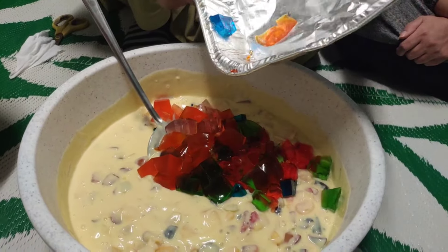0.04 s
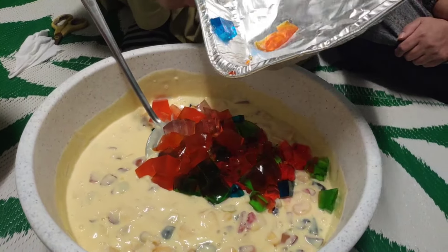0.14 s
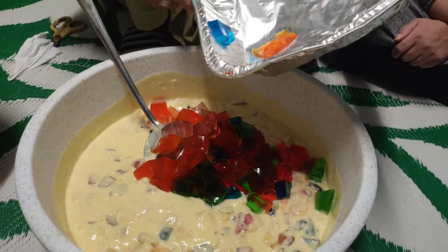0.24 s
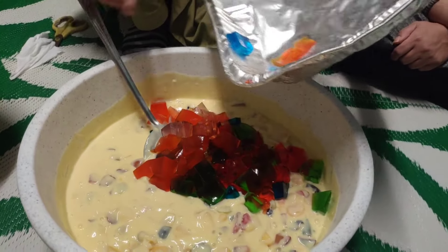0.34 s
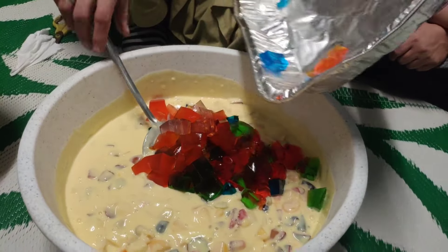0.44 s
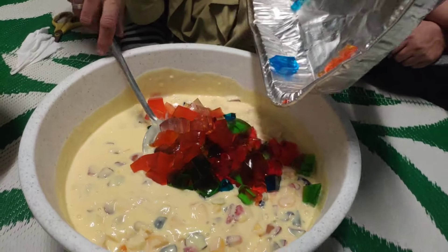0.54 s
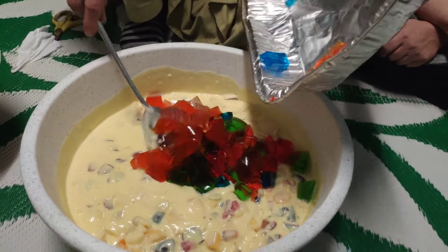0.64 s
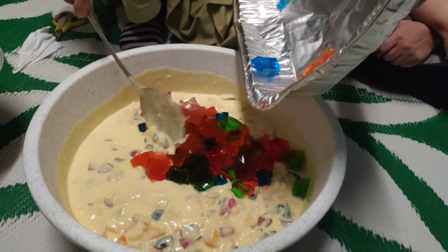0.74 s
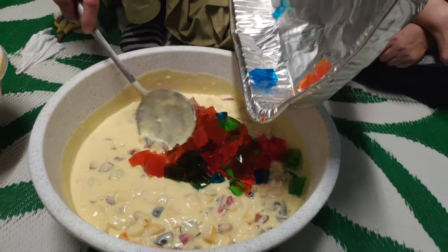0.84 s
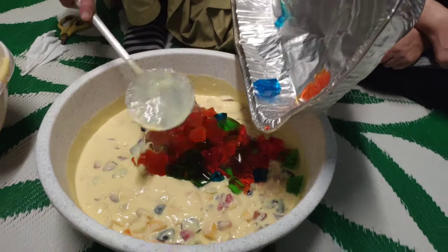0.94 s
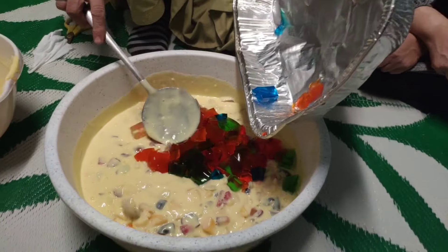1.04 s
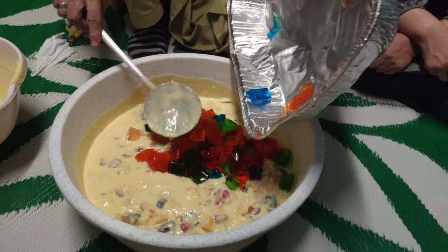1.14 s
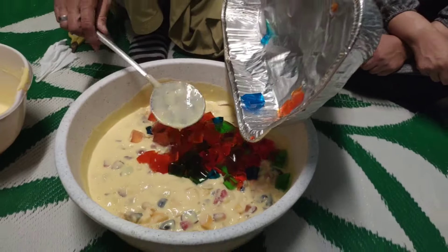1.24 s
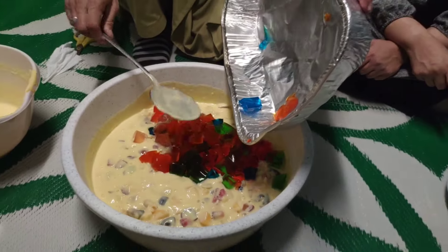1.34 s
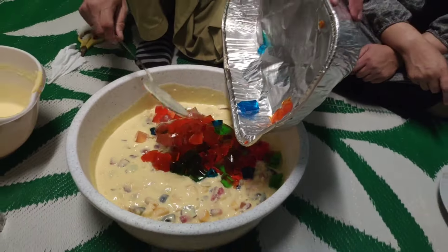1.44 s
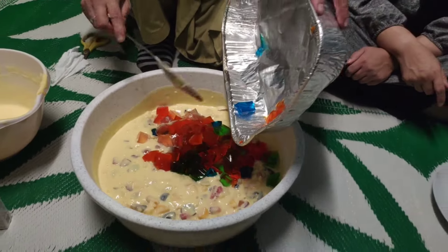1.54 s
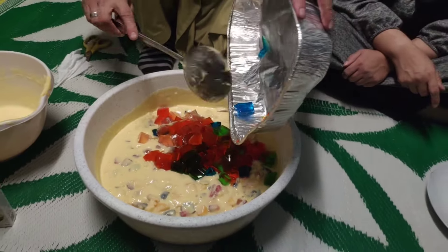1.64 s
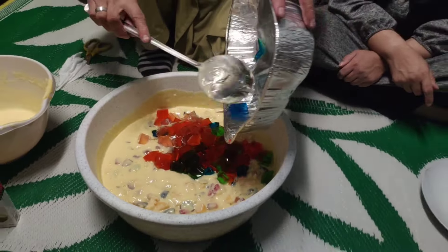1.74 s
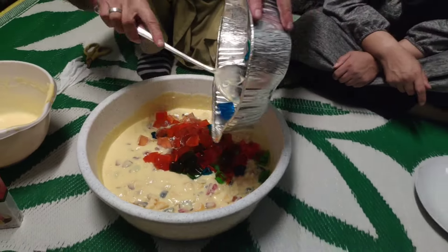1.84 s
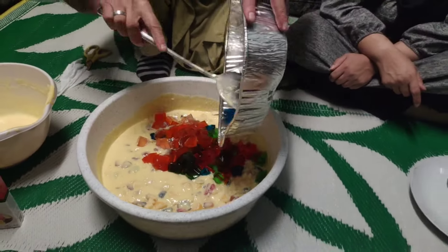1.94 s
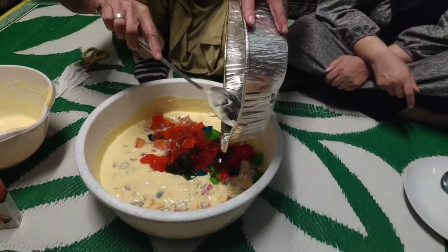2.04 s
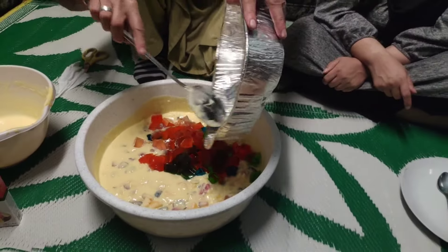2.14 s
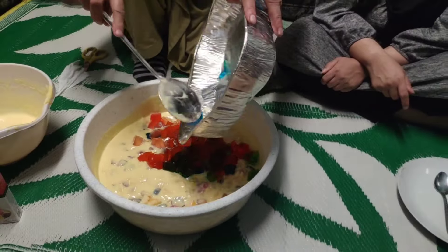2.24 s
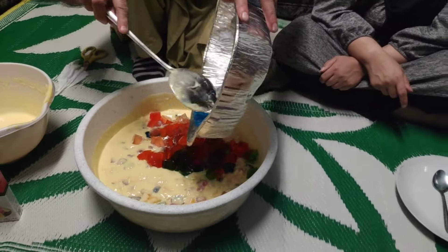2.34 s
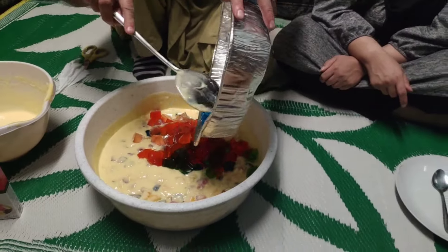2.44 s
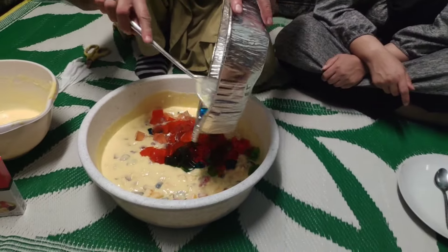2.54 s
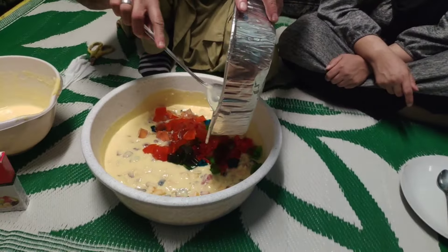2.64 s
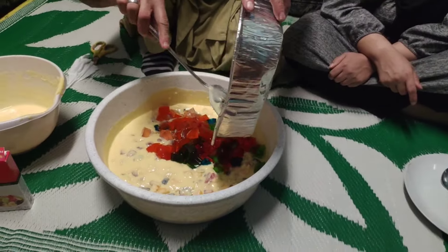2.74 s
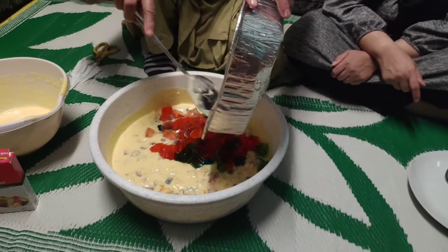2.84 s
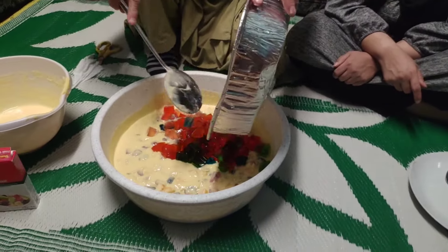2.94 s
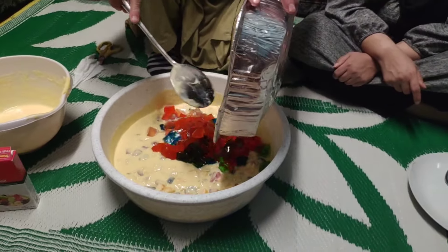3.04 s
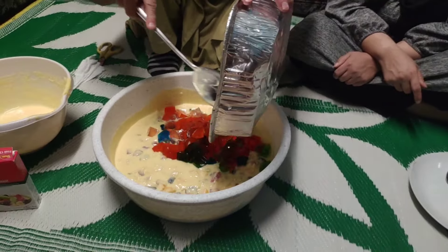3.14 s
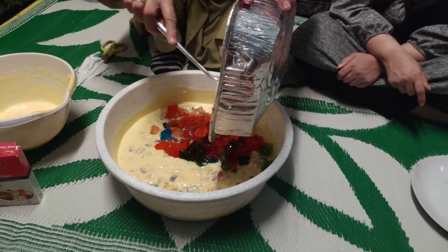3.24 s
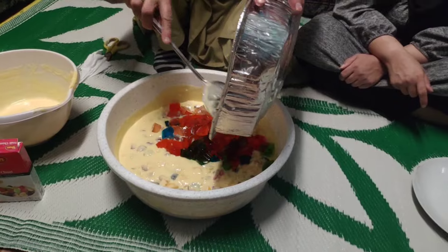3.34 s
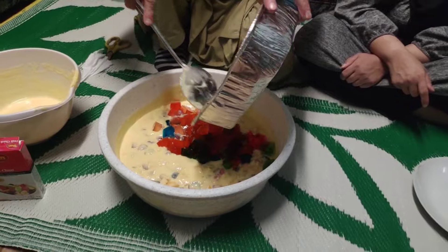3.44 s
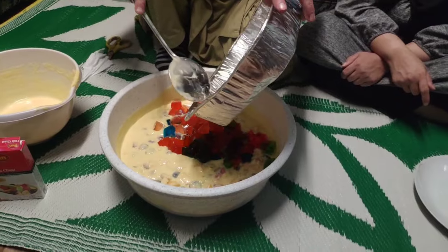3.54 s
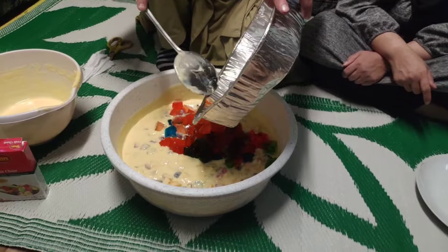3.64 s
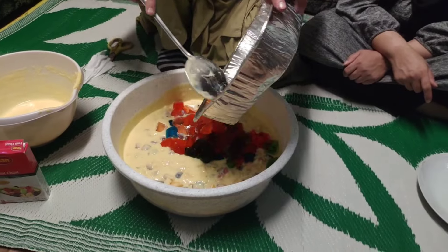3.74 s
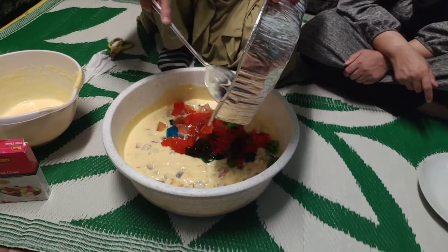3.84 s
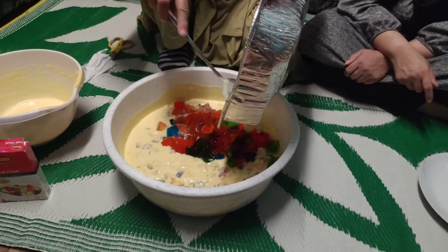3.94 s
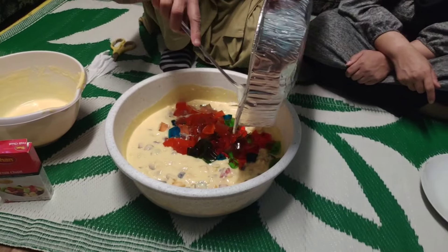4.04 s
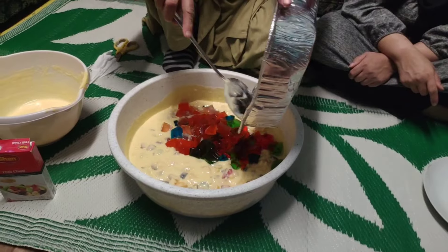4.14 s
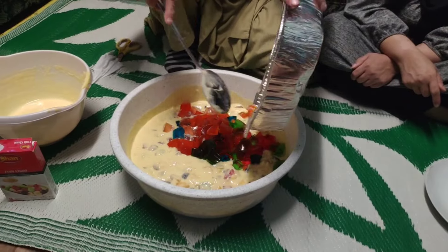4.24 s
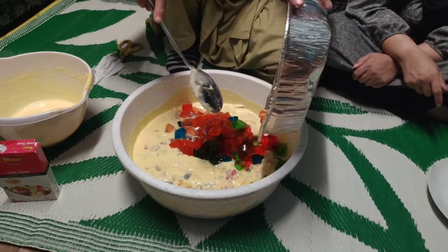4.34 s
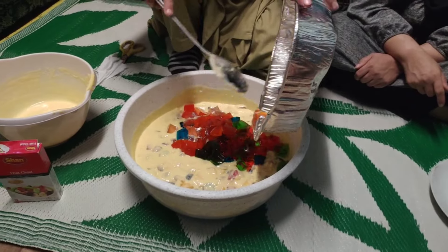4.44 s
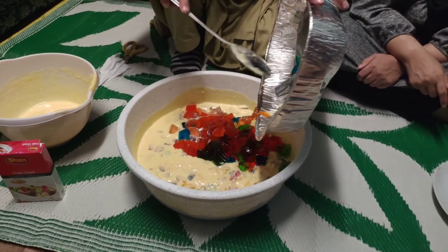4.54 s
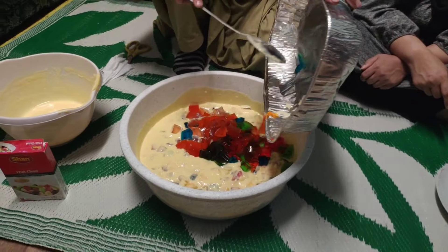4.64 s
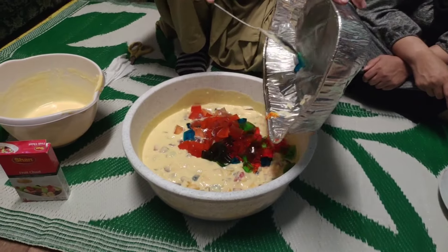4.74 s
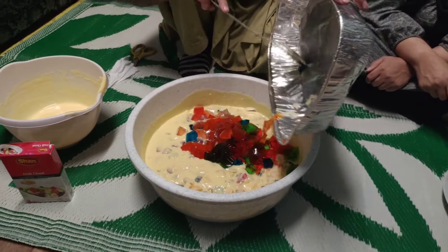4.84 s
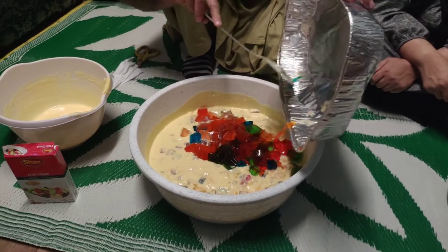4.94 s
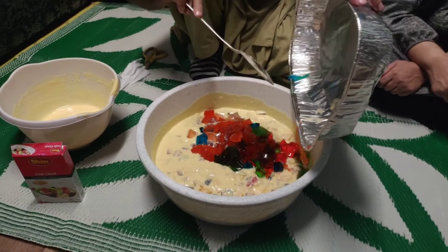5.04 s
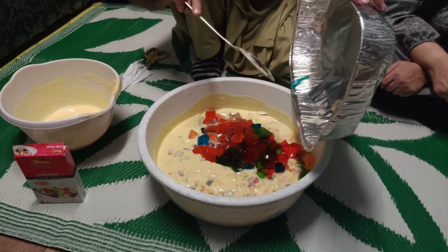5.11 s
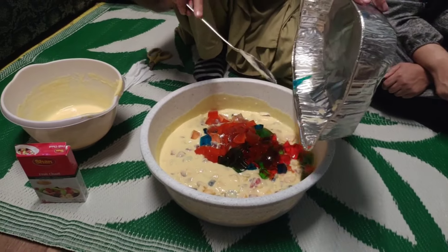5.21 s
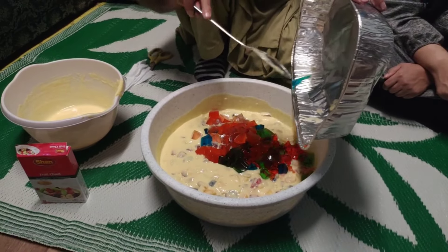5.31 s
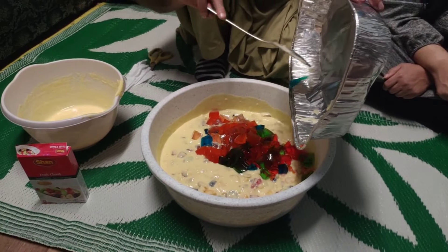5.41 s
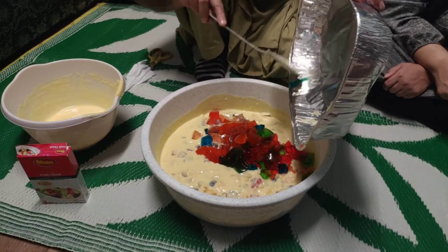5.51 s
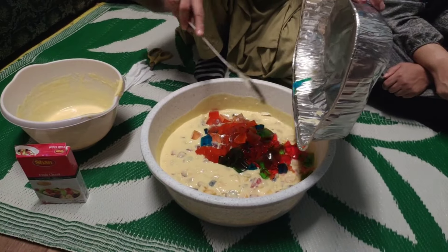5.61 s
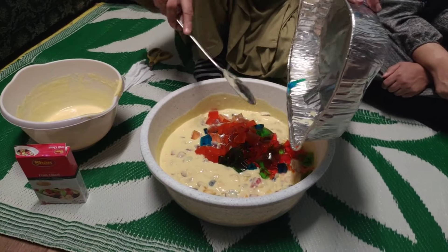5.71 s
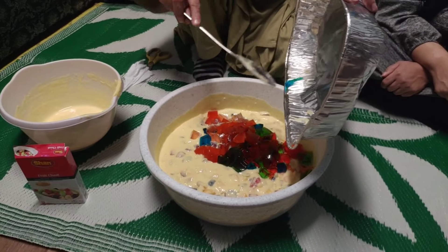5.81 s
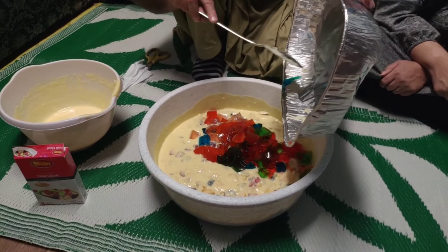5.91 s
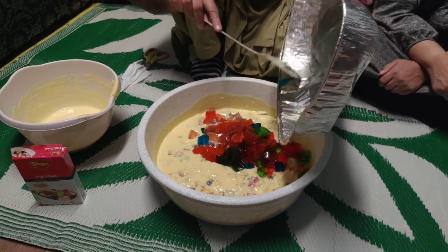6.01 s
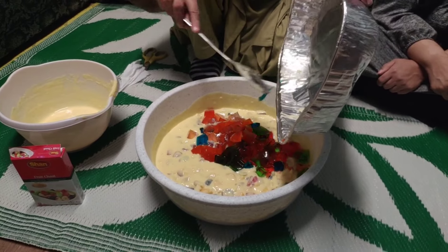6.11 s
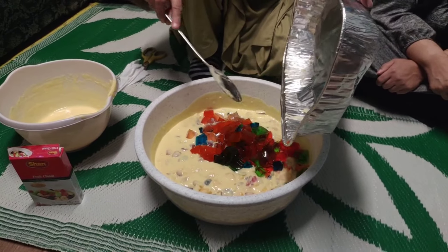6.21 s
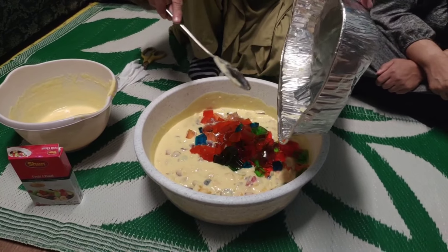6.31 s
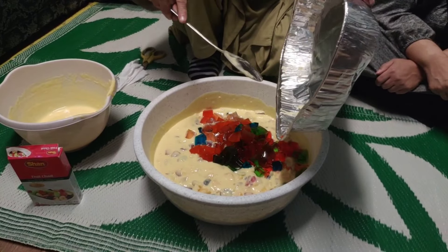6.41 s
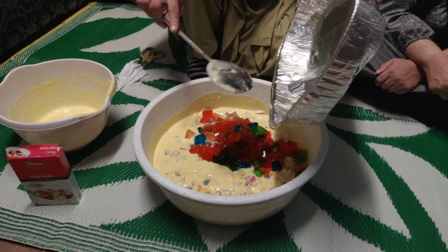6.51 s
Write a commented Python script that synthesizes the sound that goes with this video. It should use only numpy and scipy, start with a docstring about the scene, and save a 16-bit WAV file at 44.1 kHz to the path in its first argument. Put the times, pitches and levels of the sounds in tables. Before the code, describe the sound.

A spoon knocks and scrapes a crumpled foil container held over a bowl. Soft scratching and dull taps open, thinning to small crackles, before firmer metallic clanks arrive in uneven groups with gritty scrapes between them. Strong single whacks close it. The sound is dry, thin and rattly with a very short indoor tail, recorded close by, over low airy room noise and a fuzzy hum.

```python
"""Quiet kitchen: a metal spoon knocks and scrapes a thin foil tray held over a bowl.
Blows excite the crumpled foil: noise through tray modes, each band with its own rise and decay.
Strokes drag dense random slips along the foil; creases snap as short narrow noise bursts.
Soft room air with a fridge-like fuzzy hum, shaped noise spectra, lies below."""
import sys
import numpy as np
from scipy import signal
from scipy.fft import rfft, irfft, next_fast_len
from scipy.io import wavfile
from scipy.ndimage import uniform_filter1d

SR = 44100
rng = np.random.default_rng(int(sys.argv[2]) if len(sys.argv) > 2 else 0)


def generate_wav(sig):
    """Save sig (samples, or channels by samples) to the path in sys.argv[1] as 16-bit PCM at SR."""
    pcm = np.round(np.clip(np.atleast_2d(sig).T, -1, 1) * 32767).astype(np.int16)
    wavfile.write(sys.argv[1], SR, pcm)


N = 289516

# tray modes: mode_hz, width_hz, level_db (over the wash, before the spot's offset)
TRAY_MODES = [(218, 58, 4), (277, 11.8, 1), (317.4, 55, 6.5), (377.5, 7.2, -4), (567, 6.5, -8.5),
              (671.4, 11, 12.5), (757, 39, 7), (867, 25, 2), (949, 30.5, -1.5), (1160, 24, 6),
              (1300, 9.2, 9), (1414, 8, 12.5), (1500, 77, 6), (1632, 29, 5.5), (1771, 29, 5),
              (1900, 9.2, -3), (1887, 35, 11), (2174, 30, 8.5), (2541, 68, 8), (2910, 17, 1.5),
              (3516, 52, -1), (3950, 40, -0.5), (5780, 23, 8)]


def gain_of(db):
    """Decibels to amplitude gain."""
    return 10 ** (np.asarray(db) / 20)


def evened(x):
    """Scales the last axis to rms 1."""
    return x / np.sqrt(np.mean(x ** 2, axis=-1, keepdims=True) + 1e-20)


def read(points, hz):
    """Interpolates a (Hz, value) table on a log frequency axis."""
    point_hz, value = np.transpose(points)
    return np.interp(np.log(hz + 1), np.log(point_hz + 1), value)


def add(mix, start_s, sound):
    """Mixes a stereo sound in at start_s, cut at the end of the mix."""
    part = mix[:, round(start_s * SR):][:, :sound.shape[1]]
    part += sound[:, :part.shape[1]]


def paired(a, b, same):
    """Two channels of spectra with correlation same."""
    same = np.clip(same, -1, 1)
    return np.array([a, same * a + np.sqrt(1 - same ** 2) * b])


def panned(pan_db):
    """Left and right gains; pan_db is left minus right."""
    return gain_of(np.array([[.5], [-.5]]) * pan_db)


def room_air():
    """Soft air: noise spectra with drifting patches, raised at the resonances of a fuzzy mains hum."""
    # air spectrum: freq_hz, level_db (relative)
    air_spectrum = [(15, -61), (25, -33), (64, -34.5), (91, -7), (166, -12.5), (206, -1), (242, -14),
                    (326, -16), (363, -7.5), (439, -12), (623, -11), (1100, -17.5), (1890, -17.5),
                    (3150, -31), (16000, -40)]
    # air level over time: time_s, level_db
    air_level = [(0.0, -59.5), (0.5, -59), (1.1, -62.5), (2.6, -62.5), (3.4, -61), (4.2, -59.5),
                 (4.7, -62.5), (6.56, -60.5)]
    # hum peaks: peak_hz, width_hz, level_db (over the air)
    hum_peaks = [(103.6, 7.7, 6.5), (205.8, 8.8, 11.5), (301, 21, 7), (383.6, 9.8, 11), (495, 7.7, -1),
                 (544, 12.3, -2)]
    # left-right likeness: freq_hz, correlation
    air_likeness = [(60, -0.91), (150, 0.82), (380, 0.8), (950, -0.38), (2380, 0.099), (5980, -0.087),
                    (15000, -0.15)]
    # left-right balance: freq_hz, left_minus_right_db
    air_balance = [(40, 9), (70, 9), (105, 18), (140, 8.5), (250, -0.5), (1000, 0), (6000, -0.2),
                   (15000, 1)]

    frames, hz = N // 512 + 5, np.fft.rfftfreq(2048, 1 / SR)
    a, b, c, d, patches = rng.standard_normal((frames, 1025, 5)).T
    patches = uniform_filter1d(uniform_filter1d(patches, 20, 0), 8, 1)
    patches_db = 1.2 * patches / patches.std()
    hum = 1 + sum(gain_of(db) / (1 + (2 * (hz - f) / w) ** 2) for f, w, db in hum_peaks)
    spectra = paired(a + 1j * b, c + 1j * d, read(air_likeness, hz)[:, None])
    spectra *= gain_of(read(air_spectrum, hz)[:, None] + patches_db) * hum[:, None]
    spectra *= panned(read(air_balance, hz))[:, :, None]
    air = signal.istft(spectra, nperseg=2048, noverlap=1536)[1][:, :N]
    time_s, level_db = np.transpose(air_level)
    return air / air.std() * gain_of(np.interp(np.arange(N) / SR, time_s, level_db))


def foil_bands(drive, spot_db, near_hz=(), lumps_db=0):
    """Filters two drives by the foil's wash and modes; returns bands x channels x time, rms 1."""
    # dense wash between the modes: freq_hz, level_db (relative)
    foil_wash = [(47, -51), (80, -22), (248, -8.5), (309, -4), (471, -4.5), (657, -8.5), (734, -9),
                 (1020, -7.5), (1900, -15), (3100, -19), (6580, -24.5), (14600, -37.5), (16000, -65)]
    # left-right likeness: freq_hz, correlation
    tray_likeness = [(100, 0.38), (250, 0.96), (600, 0.57), (1200, 0.37), (2500, 0.8), (5000, -0.3),
                     (12000, -0.038)]
    # edges of boom, middle, clank, tizz, air: edge_hz (the inner four split the bands)
    band_edges_hz = [150, 500, 1100, 2400, 7000, 15500]
    right_lead_s = .00005  # the right port hears the tray early

    hz = np.fft.rfftfreq(drive.shape[1], 1 / SR)
    lift = 0
    for (mode_hz, width_hz, mode_db), spot in zip(TRAY_MODES, spot_db):
        lift = lift + gain_of(mode_db + spot) / (1 + 2j * (hz - mode_hz) / width_hz)
    for f in near_hz:  # foil next to the spoon: 6 dB, 0 dB in the treble
        near_db = 6 - 6.0 * (f > 2400)
        lift = lift + gain_of(near_db) / (1 + 2j * (hz / f - 1) / 0.097)
    spectra = paired(*rfft(drive), read(tray_likeness, hz))
    spectra = spectra * gain_of(read(foil_wash, hz) + lumps_db) * (1 + lift)
    spectra[0] *= np.exp(-2j * np.pi * hz * right_lead_s)
    below = [0] + [1 / (1 + (hz / f) ** 8) for f in band_edges_hz[1:-1]] + [1]
    bands = [irfft(spectra * (hi - lo), drive.shape[1]) for lo, hi in zip(below, below[1:])]
    return evened(np.array(bands))


def strokes():
    """Uneven slips of the spoon's edge, hundreds a second, each shake the foil for a moment."""
    # strokes: peak_s (most pressure), swell_s and fade_s (per 20 dB, sign ignored, fade before band share),
    # tizz_db (at weight 0), weight_db (scaled by each band's share)
    stroke_table = [(0.01, -3, 0.09, -64, 2), (0.065, .03, 0.1, -68.5, 8.5), (0.15, .02, 1.5, -76.5, 0.5),
                    (0.203, -0.08, 0.03, -60, 6.5), (0.295, .04, 0.05, -60, 3.5),
                    (0.41, 0.13, 0.07, -63, 0), (0.461, 0.09, 0.0756, -59, 1), (0.77, 0.04, .08, -64, -6),
                    (0.935, -0.04, 0.14, -68.5, -0.5), (1.055, 0.1, 0.1, -72.5, -5),
                    (1.115, .03, 0.2, -75.5, -1), (1.32, -0.05, -0.13, -72, 2),
                    (1.35, .03, 0.16, -71.5, -6), (1.62, .015, 0.09, -59, -13.5),
                    (2.149, 0.02, 0.17, -62.5, 10), (2.258, 0.0133, 0.03, -48.5, 3.5),
                    (2.293, 0.03, 0.0551, -46, 6.5), (2.432, 0.15, 0.12, -63.5, -2),
                    (2.858, 0.02, 0.2, -59, 4.5), (2.969, 0, 0.0827, -52.5, 2.5),
                    (3.059, 0.04, 0.135, -58.5, -0.5), (3.138, -0.0138, 0.085, -58, 12),
                    (3.269, .02, 0, -67, -28), (3.618, 0.08, 0.13, -59.5, 5), (3.85, 0.2, 0.14, -71, 1.5),
                    (3.91, 0.1, 0.21, -68.5, 5), (3.962, 0.08, 0.08, -62, 4.5),
                    (3.998, 0.01, 0.19, -61, 8.5), (3.72, 0.16, .06, -67.5, 7.5),
                    (4.13, 0.38, 0.31, -71, 0), (4.336, 0.04, 0.05, -59.5, 4),
                    (4.402, 0.04, 0.0743, -48.5, 0), (4.464, 0.1, 0.07, -69, 12.5),
                    (5.122, 0.0421, 0.1087, -48.5, 9.5), (5.16, 0.0218, .03, -46.5, 1),
                    (5.188, 0.0233, .06, -49, 2), (6.293, 0.02, 0.0626, -43.5, 3),
                    (6.338, 0.0363, .07, -46, 3)]
    # per band: level_db at weight 0
    stroke_band_db = [-3.5, 0, 0, 0, -2.5]
    # per band: weight_share; heavy strokes are fuller below
    weight_share = [1.11, 1.03, 0.74, 0.065, -0.23]
    # per band: fade_share; low bands linger
    fade_share = [1.25, 1.12, 0.87, 0.85, 0.85]
    rounding = 1.26  # 1 = pointed swell, 2 = dome
    slips_per_s, slip_t120_s = 250, 0.031  # rate per band; time to fall 120 dB

    size = next_fast_len(N)
    noise = rng.standard_normal((2, size))
    bands = foil_bands(noise, np.full(len(TRAY_MODES), -4.0), near_hz=(1950, 6400))
    slips = gain_of(3.5 * np.minimum(rng.exponential(1, (size, 5)), 5))
    slips = slips * (rng.random((size, 5)) < slips_per_s / SR)
    slips = slips.T + 0.22 * slips.sum(1)  # spill into the other bands
    slip_decay = gain_of(-120 * np.arange(900)[None] / SR / slip_t120_s)
    shaking = signal.oaconvolve(slips, slip_decay, axes=1)[:, :size]
    bands = bands * evened(np.sqrt(np.abs(shaking) + 2.7))[:, None]

    t, power = np.arange(0, size + 64, 64) / SR, 0
    for peak_s, swell_s, fade_s, tizz_db, weight_db in stroke_table:
        band_fade_s = np.abs(fade_s * np.array(fade_share))[:, None]
        away = np.where(t < peak_s, (peak_s - t) / abs(swell_s), (t - peak_s) / band_fade_s)
        band_db = tizz_db + np.array(stroke_band_db) + weight_db * np.array(weight_share)
        power = power + gain_of(2 * (band_db[:, None] - 20 * away ** rounding))
    pressure = np.array([np.interp(np.arange(size) / SR, t, np.sqrt(p)) for p in power])
    return (bands * pressure[:, None]).sum(0)[:, :N] * panned(.6)


def blows():
    """Each blow lands on another spot, so mode strengths differ; a crack and a thump lead the ring."""
    # blows: start_s, level_db (middle band, before the envelope), boom_db, clank_db, tizz_db, air_db (over the
    # middle), ring_factor, pan_db, crack_db, then near-spoon boom_hz, middle_hz, clank_hz, tizz_hz
    blow_table = [(0.183, -51.5, 6, 7.5, 1, -3.5, 0.82, 1, -6, 288, 670, 2180, 3260),
                  (0.27, -55.5, 5, 5.5, -5, -2, 0.75, 3, -4, 199, 640, 2180, 6780),
                  (0.308, -41, -4, -8, -27, -17.5, 0.56, 2, 9, 300, 620, 1140, 6510),
                  (0.487, -41.5, -26.5, -0.5, -16, -23.5, 0.98, 2, -12, 370, 1070, 1330, 3970),
                  (0.735, -37.5, -20, -20, -13, 1, 0.47, -0.5, -6, 183, 577, 1610, 14400),
                  (0.741, -35, -20, 4, -4.5, -6, 0.42, 1, -2, 458, 680, 1660, 6470),
                  (0.931, -50.5, -9, -22, -2, -16, 0.55, 0, 4, 447, 750, 2130, 5660),
                  (1.613, -61, -8, -10, 10, 18.5, 0.4, 3, -9, 199, 1040, 1640, 6100),
                  (2.123, -30, -4, -3.5, -14, -23.5, 1.07, 1, 7, 330, 546, 1410, 3760),
                  (2.252, -43.5, -6, 0.5, -6, -9, 1.8, 2, 3, 300, 680, 1770, 6160),
                  (2.284, -30, 7, -3, -15, -20, 1.04, 2, 3.5, 373, 675, 1650, 6840),
                  (2.294, -31.5, -13, 1, -5, -15, 0.47, -1, -4, 307, 930, 1950, 6950),
                  (2.809, -31.5, -3, 0.5, -11.5, -23, 1.26, 0.5, -1, 307, 990, 1140, 4570),
                  (2.945, -25.5, 0, -2.5, -10.5, -17, 0.65, 0.5, 5.5, 320, 920, 1920, 4450),
                  (3.032, -39.5, 1, 4.5, 2, -4, 0.71, 1, -2, 360, 810, 1870, 4000),
                  (3.127, -32, 1, -5, -11.5, -25.5, 0.92, -0.5, 1, 380, 845, 1310, 4640),
                  (3.352, -45, 3, -4, -19, -48, 0.82, 0, 3, 260, 730, 1590, 3300),
                  (3.59, -31, -4, -1.5, -6, -17, 0.99, 0, -5, 370, 770, 1580, 5570),
                  (3.977, -32.5, -2, -2, -11, -15, 1.13, -0.5, -3, 300, 710, 1450, 6300),
                  (4.223, -22.5, 3.5, -4.5, -19.5, -27.5, 1.16, 0.5, -3, 362, 915, 1610, 3980),
                  (4.35, -43, -18, 6.5, -7, -16, 1.9, -2, -9, 347, 1030, 1930, 5220),
                  (5.055, -29.5, -3, 0, -5.5, -16, 0.68, 2.5, 1, 450, 750, 1300, 3300),
                  (5.06, -17, -11, -1, -16.5, -41, 1.26, 1, -4, 316, 660, 1310, 3280),
                  (5.111, -27.5, 2, -1, -15, -24.5, 0.85, 4, 0, 347, 650, 1830, 3380),
                  (5.179, -37.5, 2, 8.5, -3, -9, 0.39, -1, 2, 350, 960, 1770, 6310),
                  (5.773, -15.5, -6, -5.5, -12.5, -26, 0.69, -0.5, 0, 267, 786, 2130, 3140),
                  (5.796, -35.5, 4, -7, -25, -42, 1.35, 0.5, 0, 323, 560, 1463, 3500),
                  (6.268, -22.5, -8, 0.5, -7.5, -17, 0.73, 1.5, 4.5, 475, 700, 2000, 5100)]
    # per band: ring_t60_s (before the ring factor)
    ring_t60_s = [0.15, 0.19, .14, 0.17, 0.19]
    # per band: rise_s; large panels start slower
    rise_s = [0.0065, 0.005, 0.0017, 0.00071, 0.0022]
    # the kitchen's short tail per band: tail_db
    tail_db = [-21.5, -23, -20, -17.5, -20.5]
    # the kitchen's short tail per band: tail_t60_s
    tail_t60_s = [0.36, 0.36, 0.23, 0.19, 0.18]
    crack_t60_s, thump_db, rebounds_per_s = 0.011, -5.0, 150
    push_db, push_hz, push_pan_db = -23.5, 113, 12  # the whole tray flexes briefly

    out, t = np.zeros((2, N)), np.arange(16384) / SR
    push_wave = np.exp(-push_hz * t / 1.8) * np.sin(2 * np.pi * push_hz * t)
    tail = gain_of(np.array(tail_db)[:, None] - 60 * t / np.abs(tail_t60_s)[:, None])
    rise = 1 - np.exp(-t / np.abs(rise_s)[:, None])
    for (start_s, level_db, boom_db, clank_db, tizz_db, air_db,
         ring_factor, pan_db, crack_db, *near_hz) in blow_table:
        spot_db = 3.4 * rng.standard_normal(len(TRAY_MODES))
        # crumples make the wash uneven
        lumps_db = 3 * evened(uniform_filter1d(rng.standard_normal(len(t) // 2 + 1), 60))
        bands = foil_bands(rng.standard_normal((2, len(t))), spot_db, near_hz, lumps_db)

        t60_s = np.abs(ring_factor) * np.array(ring_t60_s)[:, None]
        ring = gain_of(-5.5 - 60 * t / t60_s)
        crack = gain_of(crack_db - 60 * t / crack_t60_s)
        shape = (ring + crack + tail) * rise
        # the loose foil slaps back at the spoon
        rebounds = rng.random(len(t)) * (rng.random(len(t)) < rebounds_per_s / SR)
        slaps = signal.oaconvolve(rebounds, signal.windows.hann(200))[:len(t)]
        shape = shape * np.sqrt(1 + 1.2 * slaps)

        band_db = level_db + np.array([boom_db, 0, clank_db, tizz_db, air_db])
        ringing = (bands * (shape * gain_of(band_db)[:, None])[:, None]).sum(0)
        # the loudest panel (middle, clank or tizz) swings a few times
        loudest = 1 + np.argmax(band_db[1:-1])
        turns = near_hz[loudest] * t
        swing = turns * np.exp(1 - turns / 1.09) * np.sin(2 * np.pi * turns)
        thump = gain_of(band_db[loudest] + thump_db) * swing
        push = gain_of(level_db + push_db) * push_wave
        add(out, start_s, (ringing + thump) * panned(pan_db) + push * panned(push_pan_db))
    return out


def ticks():
    """Small creases snap in the foil: each a decaying narrow noise burst around its pitch."""
    # ticks: start_s, level_db (before the rise), pitch_hz, t60_s, pan_db, half_width_share (of the pitch)
    tick_table = [(0.8899, -64, 1900, 0.06, 0.0, 0.18), (0.9288, -60, 2150, 0.046, 1.0, 0.14),
                  (0.9897, -51.5, 1450, 0.053, 1, 0.071), (1.0587, -66.5, 5500, 0.068, 6, 0.16),
                  (1.1154, -62, 5340, 0.045, -7, 0.11), (3.2675, -66, 1510, 0.079, -5, 0.25),
                  (3.5062, -62, 1790, 0.1, -1, 0.31), (5.3824, -60.5, 1350, 0.054, 3, 0.28),
                  (5.9535, -55.5, 1590, 0.14, 0, 0.24), (6.0294, -63, 2244, 0.056, -2, 0.3),
                  (6.244, -71, 1920, 0.14, 2.0, 0.32)]
    tick_rise_s, likeness = 0.00041, 0.37

    out, t = np.zeros((2, N)), np.arange(8192) / SR
    hz = np.fft.rfftfreq(len(t), 1 / SR)
    for start_s, level_db, pitch_hz, t60_s, pan_db, half_width_share in tick_table:
        spectra = paired(*rfft(rng.standard_normal((2, len(t)))), likeness)
        offset = (hz - pitch_hz) / (half_width_share * pitch_hz)
        burst = evened(irfft(spectra / (1 + offset ** 2)))
        shape = gain_of(level_db - 60 * t / abs(t60_s)) * (1 - np.exp(-t / tick_rise_s))
        add(out, start_s, burst * shape * panned(pan_db))
    return out


def scene():
    """Sums room air, strokes, blows and snaps."""
    return room_air() + strokes() + blows() + ticks()


def record(dry):
    """Applies the microphone ports' colour, then a linear-phase low-pass."""
    # port colour: freq_hz, level_db
    mic_colour = [(50, -9.5), (110, -1), (1500, -2.03), (2150, 1), (2500, -3.5), (5000, 1.4), (6800, 1.5),
                  (7300, -1.5), (11000, -0.3), (14300, 2), (16000, 3)]
    edge_hz = 15850

    size = next_fast_len(N + 4096)
    colour = gain_of(read(mic_colour, np.fft.rfftfreq(size, 1 / SR)))
    coloured = irfft(rfft(dry, size) * colour, size)[:, :N]
    low_pass = signal.firwin(511, edge_hz, window=("kaiser", 9), fs=SR)
    return signal.oaconvolve(coloured, low_pass[None], "same", axes=1)


dry = scene()
out = record(dry)
generate_wav(out)
```